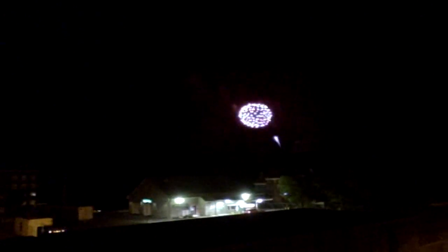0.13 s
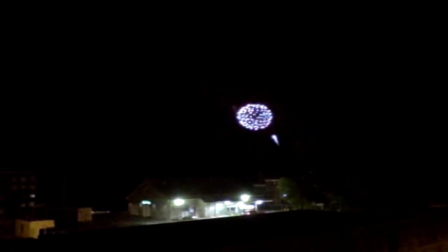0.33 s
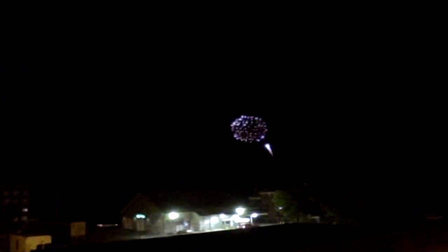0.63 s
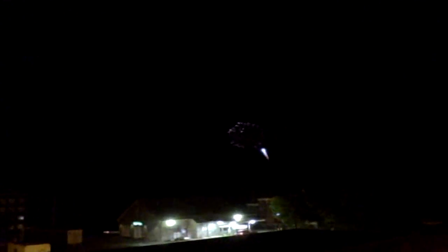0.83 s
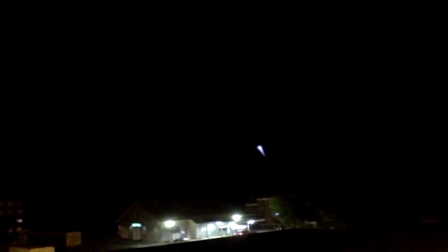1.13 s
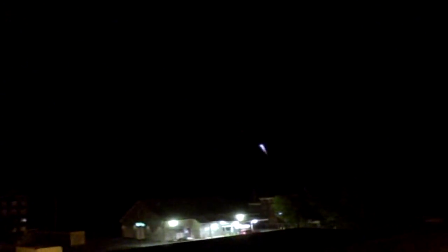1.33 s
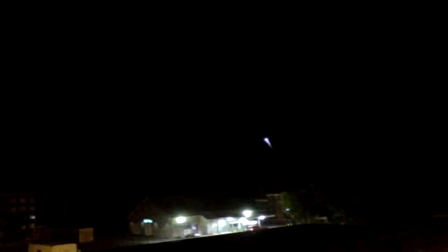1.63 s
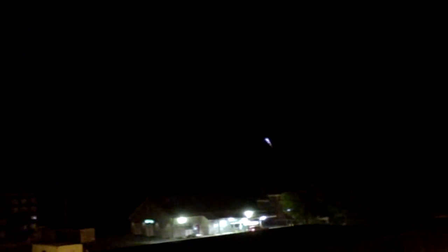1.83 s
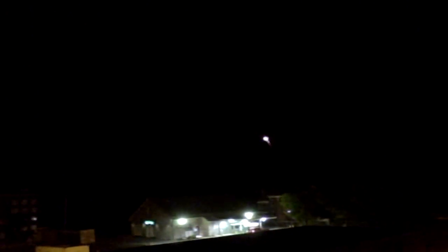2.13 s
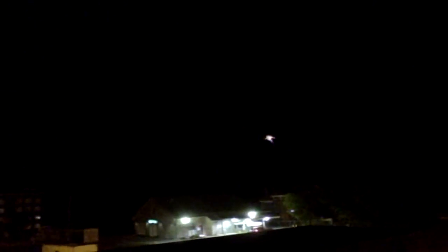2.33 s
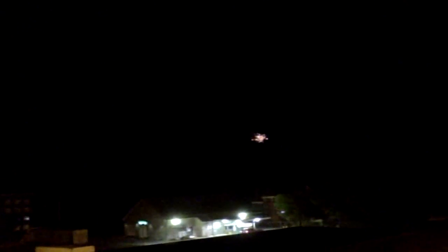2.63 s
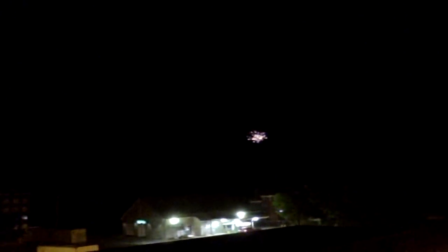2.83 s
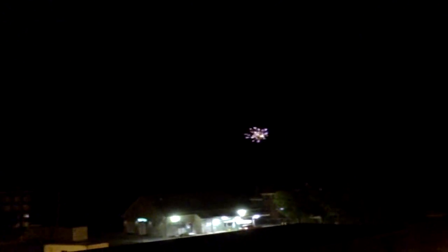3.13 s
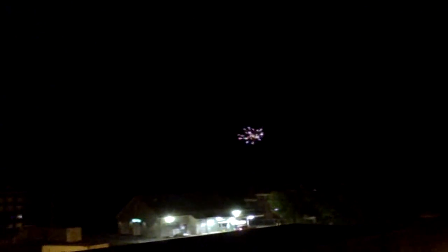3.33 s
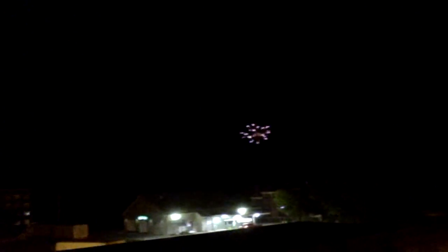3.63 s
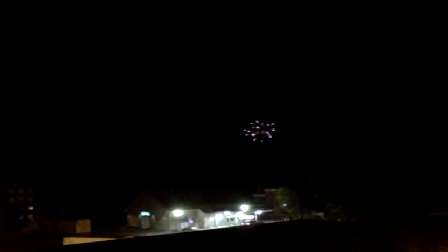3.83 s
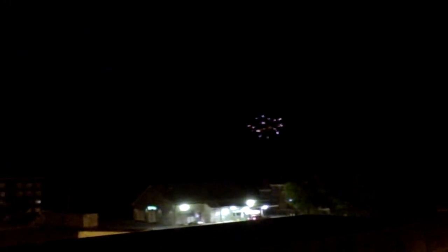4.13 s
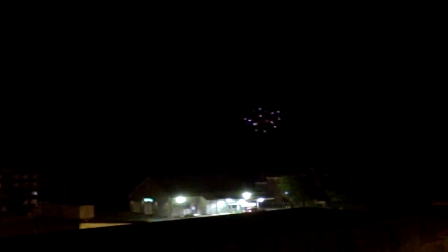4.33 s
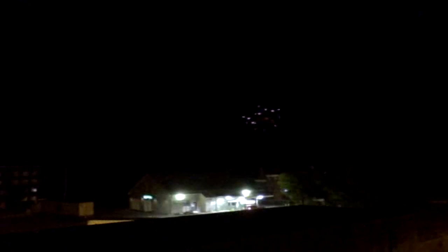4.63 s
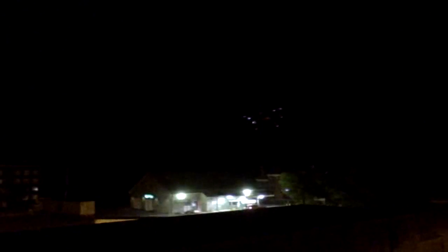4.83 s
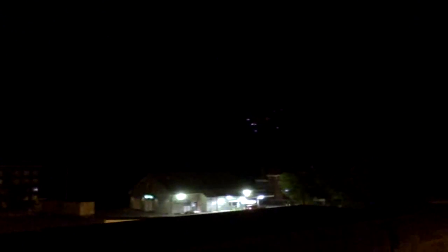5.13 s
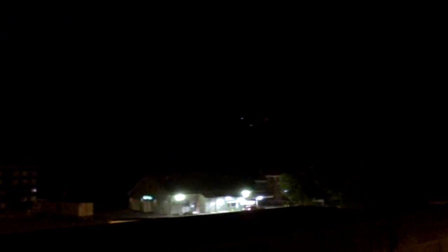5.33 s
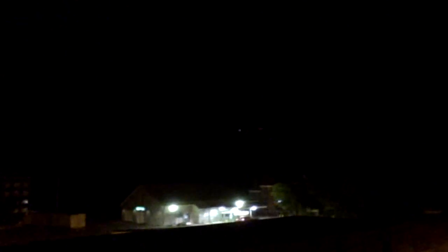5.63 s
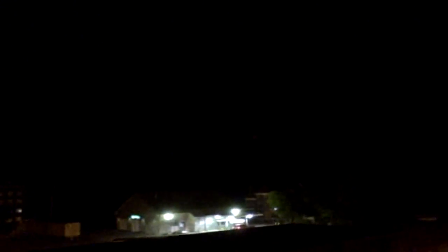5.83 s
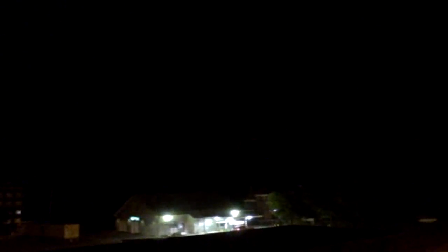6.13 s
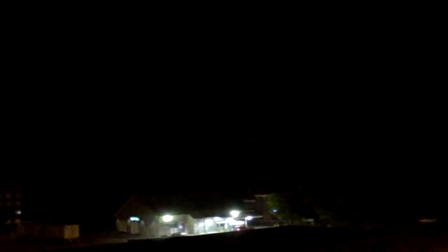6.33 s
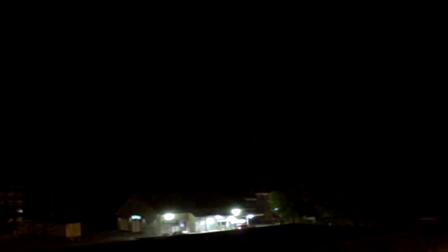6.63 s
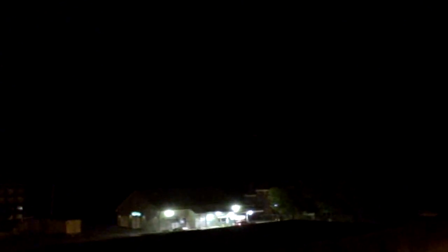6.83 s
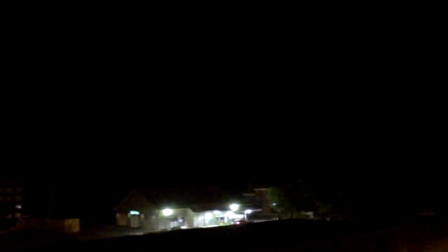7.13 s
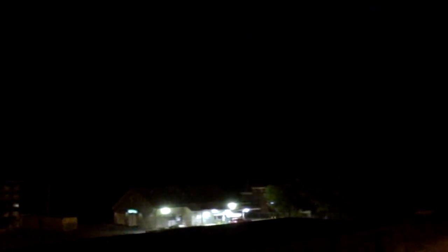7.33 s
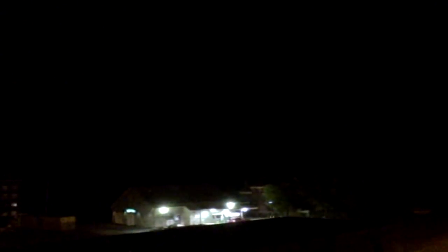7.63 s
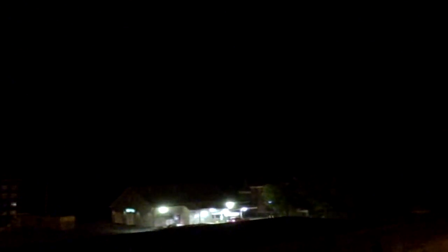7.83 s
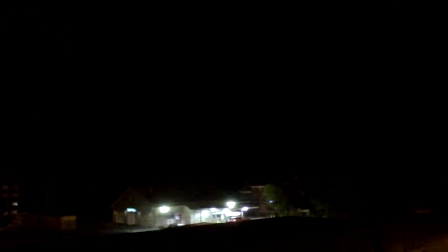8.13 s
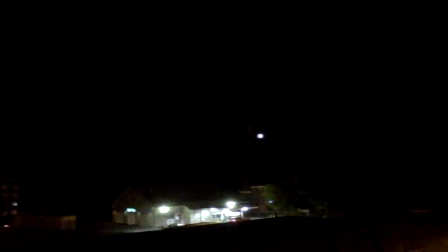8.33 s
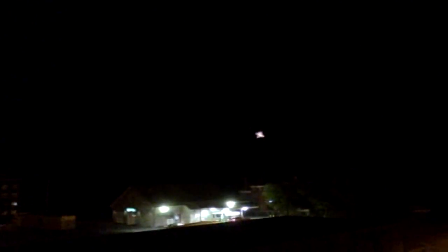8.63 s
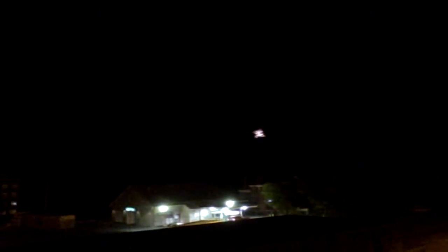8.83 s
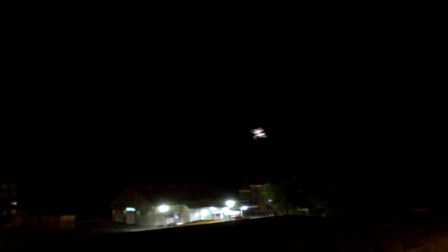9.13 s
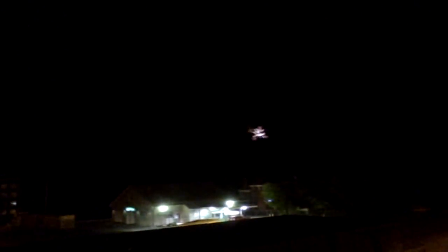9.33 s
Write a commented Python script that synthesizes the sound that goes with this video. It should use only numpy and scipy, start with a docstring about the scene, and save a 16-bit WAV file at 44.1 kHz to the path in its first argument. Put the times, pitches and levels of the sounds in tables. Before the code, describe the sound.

Aerial fireworks heard at a distance in mono across a dark open place with road noise. Three bangs, about three seconds apart, grow stronger; the last two clip harshly and briefly push the background down. Clattering reflections, paired knocks, small pops and soft far rumbles follow. Cars pass in smooth swells, an engine drone sinks and recedes, and a thin high hiss swells once near the end.

```python
"""Night beside a road, one small microphone: a steady rush, passing cars and an engine slowly winding down.
Far-off firework shells burst at 0.3, 3.2 and 6.4 s: decaying shock waves that overload the microphone.
After each, buildings return a rattle of scattered pulses and a double knock, and hills return late thuds;
smaller pops and knocks fall among these. Road and hiss are shaped noise, the engine a set of gliding sines.
Late on the traffic grows busier, the engine recedes and a thin high hiss swells once."""
import sys
import numpy as np
from scipy import signal
from scipy.fft import rfft, irfft
from scipy.io import wavfile

SR = 44100
rng = np.random.default_rng(int(sys.argv[2]) if len(sys.argv) > 2 else 0)


def to_wav(sig):
    """Store sig (one row per channel, or 1-D mono) as 16-bit WAV at the path in sys.argv[1].

    Samples outside -1..1 are clipped; the rate is SR.
    """
    pcm = np.clip(np.atleast_2d(sig), -1, 1) * 32767
    pcm = np.round(pcm).astype(np.int16)
    wavfile.write(sys.argv[1], SR, pcm.T)  # frames by channels


N = 417627

# each shell: (time [s], blast level [dB], blast pitch [Hz], crack delay [s], crack level [dB],
#   slap level [dB], rattle level [dB], rattle length [s], far rumble level [dB])
SHELLS = [(0.3334, 7, 105.2, .0012, 8, -15, -13, 0.059, -45),
          (3.1514, 25.5, 129.3, .0052, 19, 14, -2.5, 0.17, -19),
          (6.4340, 34, 89.6, .007, 18.5, 19.5, 0.5, .19, -17.5)]
# colour of each shell's rattle off the buildings, one list a shell: (frequency [Hz], relative density [dB])
RATTLE_SPECTRA = [
    [(24, -25), (40, -4), (101, -7), (339, -13), (427, -7), (506, -11), (909, -9), (1050, -19), (2060, -46),
     (6000, -48), (7800, -85), (13200, -120)],
    [(24, -41), (40, -7.5), (202, 1), (246, -2.5), (288, -3), (329, -9.5), (375, -5.5), (834, -19),
     (1450, -21), (1850, -38), (5870, -54.5), (8000, -65), (10400, -99), (17600, -120)],
    [(18, -44), (30, -17), (76, 4), (199, -6), (303, -5), (349, -12.5), (402, -7.5), (507, -10), (656, -12),
     (1350, -22), (6190, -52), (8000, -60), (10400, -97), (17600, -120)],
]
# colour of the rumble off far hills: (frequency [Hz], relative density [dB])
FAR_HILL_SPECTRUM = [(40, -23.5), (100, -8), (180, -3.5), (300, -3.5), (600, -11.5), (1200, -23),
                     (3000, -60), (6000, -110)]
# immediate slaps off ground and roofs: (delay [s], level relative to the shell's slap [dB], pitch [Hz])
SLAPS = [(0.0119, 0, 148), (0.0162, -1, 128), (0.026, 1, 290)]
# how each shell comes back: (near wall delay [s], second wall delay [s], wall level [dB],
#   wall pitch [Hz], hills level [dB], extra hill delay [s])
RETURNS = [(0.327, 0.4038, -7, 92, -15, 0), (0.3315, 0.3845, 1, 145, -8.5, .019),
           (.3328, .3884, 4.5, 91, 2.5, 0)]
# hillsides that return every bang: (delay [s], level relative to the shell's hills [dB], pitch [Hz])
HILLSIDES = [(0.953, -13.5, 260), (1.110, -6.5, 150), (1.1735, -6, 175), (1.549, -14.5, 140),
             (1.993, -12.5, 140), (2.036, -6.5, 135), (2.383, -14.5, 114)]
# smaller pops and knocks: (time [s], shock level [dB], pitch [Hz], decay [cycles])
POPS = [(0.3592, -7.5, 920, 1.8), (.442, -11, 86, 0.68), (0.6502, -10.5, 896, 0.23), (0.678, -5, 840, 0.85),
        (.9012, -13, 746, 0.61), (3.2758, 2, 292, 0.95), (3.313, 0, 125, 0.21), (3.3150, -2.5, 533, 0.8),
        (3.6576, -7, 333.6, 0.71), (3.7485, -11, 690, 0.65), (4.2890, -14, 172, 1.5),
        (4.3066, -12, 290, 0.35), (5.212, -9, 189, 0.74), (6.557, 8.5, 333, .64), (6.694, -2, 86.5, 0.4)]
# cars passing: (time when nearest [s], tyre level [dB], time to fall by 3 dB [s])
CARS = [(0, -31.5, 0.74), (2.9, -44, 1.5), (5.6, -32.5, 0.5), (9.449, -32.5, 0.9)]
# tyre resonances: (centre [Hz], width [Hz], relative level [dB])
TYRE_RESONANCES = [(1420, 300, 7.5), (3390, 480, -11)]
# bass of road and distant booms, before its roll-off: (frequency [Hz], relative density [dB])
RUMBLE_SPECTRUM = [(12, -37), (20, -12.5), (33, -2.5), (65, 1.5), (91, 5.5), (166, -6), (201, -24),
                   (264, -4.5), (400, -10), (520, -36.5), (880, -120)]
# road roar before and after the traffic shifts: (frequency [Hz], relative density [dB])
ROAR_BEFORE = [(88, -38.5), (150, -20.5), (172, -1.5), (200, -3), (302, -5), (340, -11), (407, -5.5),
               (443, -3), (584, -6), (629, -8), (923, -7), (1110, -13), (1440, -16), (1900, -41.5),
               (2470, -54.5), (4180, -120)]
ROAR_AFTER = [(88, -29), (150, 1), (200, -4), (252, -2), (336, -6), (478, -6.5), (707, -10), (857, -9),
              (1080, -13.5), (1200, -11.5), (1400, -12.5), (1900, -27.5), (2470, -50), (4180, -120)]
# road hiss before and after the traffic shifts: (frequency [Hz], relative density [dB])
HISS_BEFORE = [(1000, -29), (1700, 0), (2050, -12), (2320, -5.5), (2770, -10), (3290, -8.5), (3870, -16),
               (4520, -18.5), (6180, -17.5), (7710, -31), (8820, -50), (10000, -44), (13000, -83),
               (22000, -120)]
HISS_AFTER = [(1000, -30), (1700, -3), (1890, -10.5), (2300, -2), (2790, -10.5), (3390, -8), (3840, -18.5),
              (4390, -20.5), (5320, -19.5), (6360, -21), (7540, -32.5), (8620, -44.5), (10000, -52.5),
              (13000, -87), (22000, -120)]
# engine orders: (multiple of shaft frequency [-])
SHAFT_ORDERS = (3, 4, 6, 8, 9)
# strength of each of those orders: (relative level [dB])
ORDER_LEVELS = (2, -3, 2, -5, -3)
# exhaust resonances that the orders sweep through: (centre [Hz], width [Hz], level [dB])
EXHAUST_RESONANCES = [(51.3, 10, -32.5), (95, 5, -31.5), (116.7, 5.8, -22.5), (131.2, 5, -28),
                      (171.3, 10, -29)]

# the crack's one skip off the ground; its level is relative to the crack
SKIP_S, SKIP_DB, SKIP_HZ = .006, -10.5, 515
# steady traffic; car hiss is relative to the cars' tyre level
RUMBLE_DB, ROAR_DB, HISS_DB, CAR_HISS_DB = -26, -25, -42, -14
# late rise of the steady roar and hiss
BUSIER_S, BUSIER_SPAN_S, BUSIER_DB = 6.2, 0.14, 2.14
# the shaft slows by a fixed share each second, and the engine recedes late on
ENGINE_START_HZ, ENGINE_SLOWING_PER_S = 22.17, .0505
ENGINE_LEAVES_S, ENGINE_FADE_DB_PER_S = 6.7, 3.5
# one swell of thin high hiss; the hold is counted from its start
SIZZLE_S, SIZZLE_DB, SIZZLE_RISE_S, SIZZLE_HOLD_S, SIZZLE_FALL_DB_PER_S = 6.93, -47.5, 0.1, 0.29, 32
# upper edge of the band heard
EDGE_HZ = 16300


def fireworks(crack_hz=640, crack_cycles=0.65, slap_cycles=0.34, rattle_rise_s=0.0033, rattle_drop_power=1.75,
              rumble_rise_s=0.12, rumble_t60_s=9.8, boom_t60_s=9.1):
    """Each shell: blast, crack and skip, slaps and rattle off near buildings, rumble and boom off far hills."""
    out, t = np.zeros(N), np.arange(N) / SR
    for shell, spectrum in zip(SHELLS, RATTLE_SPECTRA):
        s, db, hz, crack_delay_s, crack_db, slap_db, rattle_db, rattle_s, rumble_db = shell
        add(out, s, gain_of(db) * blast(hz, cycles=0.358, lead=0.319))

        crack_s = s + crack_delay_s
        add(out, crack_s, thud(crack_db, crack_hz, crack_cycles, scuff_db=-10))
        add(out, crack_s + SKIP_S, thud(crack_db + SKIP_DB, SKIP_HZ, slap_cycles))
        for delay_s, relative_db, slap_hz in SLAPS:
            add(out, s + delay_s, thud(slap_db + relative_db, slap_hz, slap_cycles))

        # the rattle holds while the front sweeps the buildings, then drops away
        sweep = (1 - np.exp(-t / rattle_rise_s)) * np.exp(-(t / rattle_s) ** rattle_drop_power)
        add(out, s, gain_of(rattle_db) * sweep * scatter(spectrum, per_s=8000))

        roll = gain_of(rumble_db) * (1 - np.exp(-t / rumble_rise_s))
        hill_rumble = gain_of(-60 * t / rumble_t60_s) * scatter(FAR_HILL_SPECTRUM, per_s=400)
        boom = gain_of(-60 * t / boom_t60_s) * low_rumble()
        add(out, s, roll * hill_rumble)
        add(out, s, roll * boom)
    return out


def blast(hz, cycles, lead):
    """A shock after a long path: a few rounded lobes, the first cut short by a lead in cycles; peak 1."""
    turns = hz * np.arange(4096) / SR
    wave = turns * np.exp(-turns / cycles) * np.sin(2 * np.pi * (turns + lead))
    return -wave / abs(wave).max()


def thud(db, hz, cycles, scuff_db=-14, scuff_limit_db=-1):
    """A small or reflected shock with its puff of scattered sound, which stops growing with loud shocks."""
    wave = gain_of(min(db, scuff_limit_db) + scuff_db) * scuff()
    add(wave, 0, gain_of(db) * blast(hz, cycles, lead=0.083))
    return wave


def scuff(low_hz=260, high_hz=900, top_hz=4500, decay_s=0.0063):
    """Rough ground smears a thud into a brief puff of mid-range noise."""
    puff = filtered(rng.standard_normal(SR // 4), low_hz, "high")
    puff = filtered(puff, high_hz, "low")
    puff = evened(filtered(puff, top_hz, "low"))
    return puff * np.exp(-np.arange(len(puff)) / SR / decay_s)


def scatter(spectrum, per_s):
    """A bang returning from many surfaces: a crowd of small coloured pulses, rms 1."""
    pulses = rng.standard_normal(N) * (rng.random(N) < per_s / SR)
    coloured = rfft(pulses) * colour(spectrum, np.fft.rfftfreq(N, 1 / SR))
    return evened(irfft(coloured, N))


def low_rumble(split_hz=180):
    """Bass noise that carries from far away, rolled off above the split, rms 1."""
    return noise(lambda f: colour(RUMBLE_SPECTRUM, f) / np.sqrt(1 + (f / split_hz) ** 4))


def echoes(wall_cycles=0.34, second_wall_db=-1, edge_s=.0035, edge_db=-8, edge_hz=480, edge_cycles=0.61,
           corner_s=0.0078, corner_db=-7, corner_hz=260):
    """Two walls reflect each shell, the nearer with a sharp edge, the farther with a second bump; then hills."""
    out = np.zeros(N)
    for (s, *_), (near_s, second_s, wall_db, wall_hz, hills_db, extra_s) in zip(SHELLS, RETURNS):
        add(out, s + near_s, thud(wall_db, wall_hz, wall_cycles, scuff_db=-13))
        add(out, s + near_s + edge_s, thud(wall_db + edge_db, edge_hz, edge_cycles))
        add(out, s + second_s, thud(wall_db + second_wall_db, wall_hz, wall_cycles, scuff_db=-17))
        add(out, s + second_s + corner_s, thud(wall_db + corner_db, corner_hz, wall_cycles, scuff_db=-8.5))
        for delay_s, relative_db, hz in HILLSIDES:
            add(out, s + delay_s + extra_s, hill_echo(hills_db + relative_db, hz))
    return out


def hill_echo(db, hz, cycles=0.43, smear_db=-4, smear_rise_s=0.0036, smear_decay_s=.012, low_hz=220, high_hz=620):
    """A dull thud from a hillside, drawn out by trees and slopes into a short low-mid puff."""
    t = np.arange(SR // 4) / SR
    puff = filtered(rng.standard_normal(len(t)), low_hz, "high")
    puff = evened(filtered(puff, high_hz, "low", order=3))
    wave = gain_of(smear_db) * puff * (1 - np.exp(-t / smear_rise_s)) * np.exp(-t / smear_decay_s)
    add(wave, 0, filtered(blast(hz, cycles, lead=.065), high_hz, "low"))
    return gain_of(db) * wave


def pops():
    """Smaller pops and knocks, many of them returns of the shells, as short shocks with a puff of noise."""
    out = np.zeros(N)
    for s, db, hz, cycles in POPS:
        add(out, s, thud(db, hz, cycles))
    return out


def road(flutter_db=0.77, tyre_top_hz=5000):
    """Steady rumble under roar, hiss and passing tyres; all but the rumble flutter slightly in the night air."""
    t = np.arange(N) / SR
    car_power = sum(gain_of(db) ** 2 / (1 + ((t - s) / span) ** 2) for s, db, span in CARS)
    cars = np.sqrt(car_power)
    busier = gain_of(BUSIER_DB * (1 + np.tanh((t - BUSIER_S) / BUSIER_SPAN_S)) / 2)

    roar = gain_of(ROAR_DB) * busier * shifting(ROAR_BEFORE, ROAR_AFTER, s=3.41, span=1.0)
    # steady and car hiss add as powers
    hiss_level = np.hypot(gain_of(HISS_DB) * busier, gain_of(CAR_HISS_DB) * cars)
    hiss = hiss_level * shifting(HISS_BEFORE, HISS_AFTER, s=6.6, span=0.9)
    tyres = noise(lambda f: sum(gain_of(db) / (1 + ((f - hz) / (width / 2)) ** 2)
                                for hz, width, db in TYRE_RESONANCES))
    rush = roar + cars * filtered(tyres, tyre_top_hz, "low") + hiss
    return gain_of(RUMBLE_DB) * low_rumble() + rush * gain_of(flutter_db * drift(12))


def shifting(early, late, s, span):
    """Noise whose spectrum turns from one shape to another around time s, at equal power."""
    angle = np.pi / 4 * (1 + np.tanh((np.arange(N) / SR - s) / span))
    before = np.cos(angle) * noise(lambda f: colour(early, f))
    after = np.sin(angle) * noise(lambda f: colour(late, f))
    return before + after


def engine(waver=0.0028, throb_db=2.6):
    """Orders of a slowing shaft, each throbbing on its own and swelling as it crosses an exhaust resonance."""
    t = np.arange(N) / SR
    hz = ENGINE_START_HZ * np.exp(-ENGINE_SLOWING_PER_S * t)
    shaft = 2 * np.pi * np.cumsum(hz * (1 + waver * drift(8.5))) / SR
    out = np.zeros(N)
    for k, order_db in zip(SHAFT_ORDERS, ORDER_LEVELS):
        power = sum(gain_of(db) ** 2 / (1 + ((k * hz - centre) / (width / 2)) ** 2)
                    for centre, width, db in EXHAUST_RESONANCES)
        throb = gain_of(order_db + throb_db * drift(6))
        out += np.sqrt(2 * power) * throb * np.sin(k * shaft)
    return out * gain_of(-ENGINE_FADE_DB_PER_S * np.maximum(t - ENGINE_LEAVES_S, 0))


def sizzle(centre_hz=6000, width_hz=1300):
    """A soft band of high hiss that rises, holds and fades."""
    t = np.arange(N) / SR - SIZZLE_S
    rise = np.sin(np.pi / 2 * np.clip(t / SIZZLE_RISE_S, 0, 1)) ** 2
    level_db = SIZZLE_DB - SIZZLE_FALL_DB_PER_S * np.maximum(t - SIZZLE_HOLD_S, 0)
    hiss = noise(lambda f: np.exp(-((f - centre_hz) / width_hz) ** 2 / 2) / (1 + (f / 8000) ** 20))
    return rise * gain_of(level_db) * hiss


def gain_of(db):
    """Decibels to a factor."""
    return 10 ** (np.asarray(db) / 20)


def evened(x):
    """Scales to rms 1."""
    return x / np.sqrt(np.mean(x ** 2) + 1e-20)


def add(mix, s, sound):
    """Mixes a sound in at time s."""
    part = mix[round(s * SR):][:len(sound)]
    part += sound[:len(part)]


def filtered(x, hz, kind, order=2):
    """Causal Butterworth filter."""
    sections = signal.butter(order, np.minimum(hz, SR / 2 - 1), kind, fs=SR, output="sos")
    return signal.sosfilt(sections, x)


def noise(shape):
    """Noise of rms 1 whose magnitude follows shape(Hz)."""
    spectrum = rfft(rng.standard_normal(N)) * shape(np.fft.rfftfreq(N, 1 / SR))
    return evened(irfft(spectrum, N))


def colour(points, hz):
    """Gain of a (frequency [Hz], level [dB]) spectrum, joined on a log axis."""
    f, db = np.transpose(points)
    return gain_of(np.interp(np.log(hz + 1), np.log(f), db))


def drift(hz):
    """Slow random motion of rms 1, up to about hz."""
    return noise(lambda f: np.exp(-(f / hz) ** 2))


def scene():
    """Fireworks and their echoes over the road, in one channel."""
    return (fireworks() + echoes() + pops() + road() + engine() + sizzle())[None]


def record(dry, ceiling=0.93, threshold_db=-12, duck=0.55, hold_fall_db_per_s=10, self_noise_db=-77,
           treble_hz=11800, fizz=0.46, fizz_hz=6600):
    """Gain dips after bangs and creeps back; loud bangs flatten with a bright fizz at their edges; band limit."""
    x = dry[0]
    power_db = 10 * np.log10(filtered(np.clip(x, -1, 1) ** 2, 2.3, "low", order=1) + 1e-9)
    # hold each power peak, letting it fall at a steady rate
    fall = np.arange(N) / SR * hold_fall_db_per_s
    held_db = np.maximum.accumulate(power_db + fall) - fall
    over_db = np.maximum(held_db - threshold_db, 0)
    x = x * gain_of(-duck * filtered(over_db, 0.98, "low", order=1))

    flat = np.clip(x, -ceiling, ceiling)
    # a bright fizz edges each corner of the flattened wave
    flat = flat + fizz * filtered(flat - x, [fizz_hz / 2.04, fizz_hz * 1.7], "band", order=3)
    x = np.clip(filtered(flat, treble_hz, "low"), -1, 1)
    x = x + gain_of(self_noise_db) * rng.standard_normal(N)
    band_limit = signal.firwin(255, EDGE_HZ, window=("kaiser", 8), fs=SR)
    return signal.oaconvolve(x, band_limit, "same")[None]


dry = scene()
out = record(dry)
to_wav(out)
```